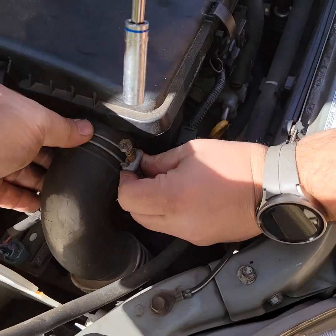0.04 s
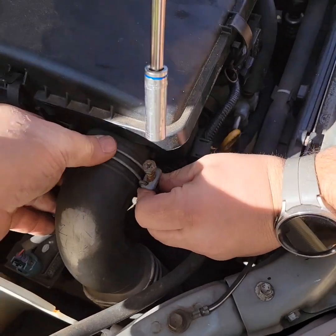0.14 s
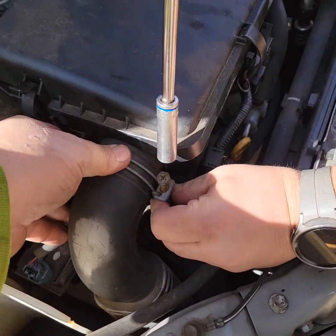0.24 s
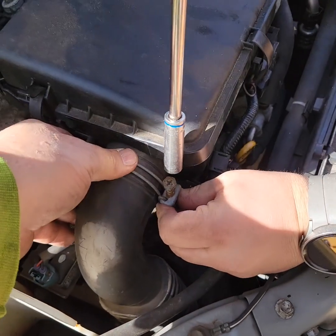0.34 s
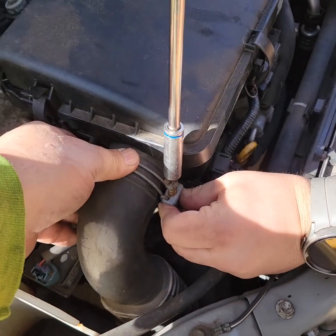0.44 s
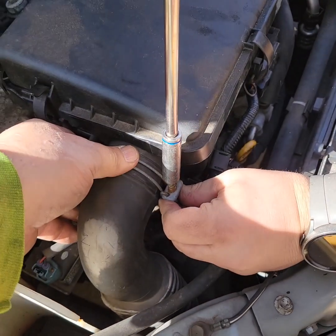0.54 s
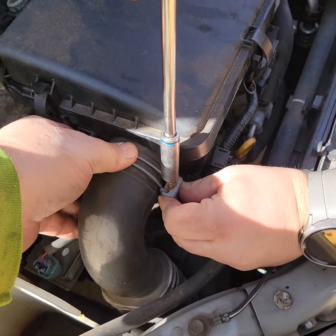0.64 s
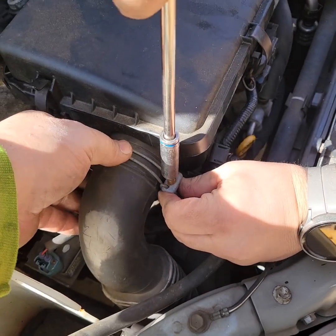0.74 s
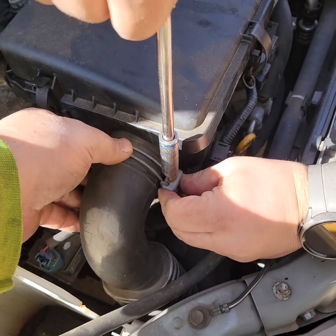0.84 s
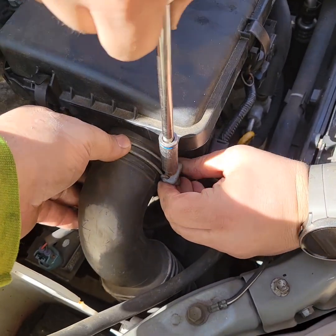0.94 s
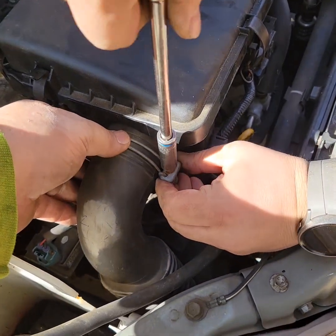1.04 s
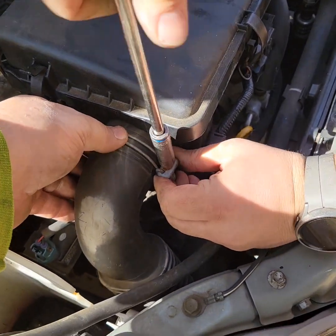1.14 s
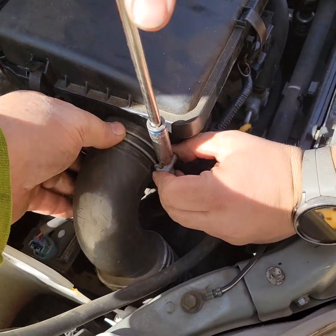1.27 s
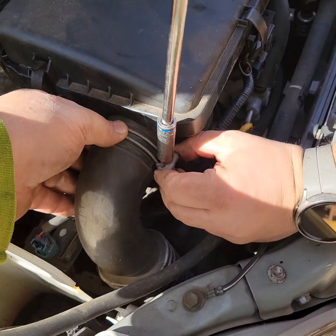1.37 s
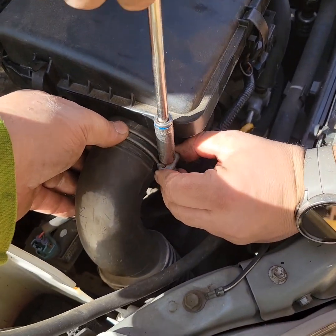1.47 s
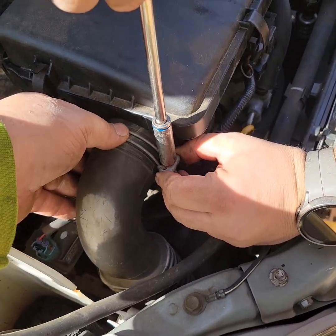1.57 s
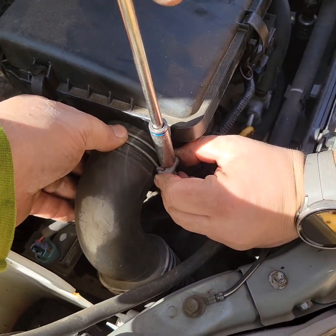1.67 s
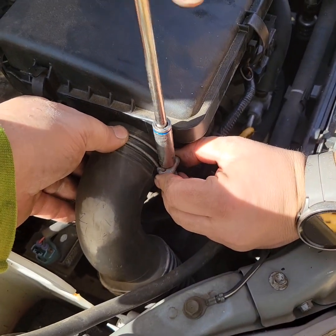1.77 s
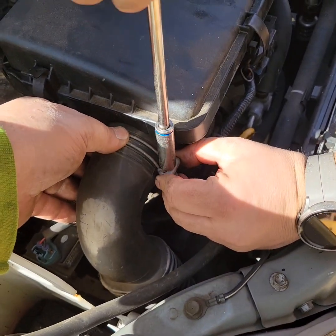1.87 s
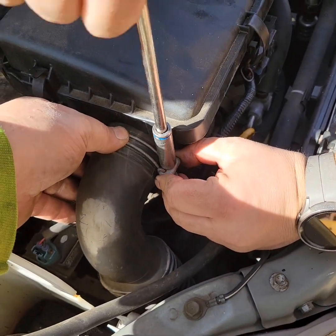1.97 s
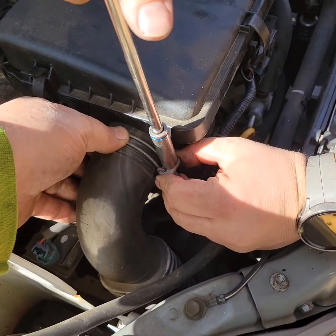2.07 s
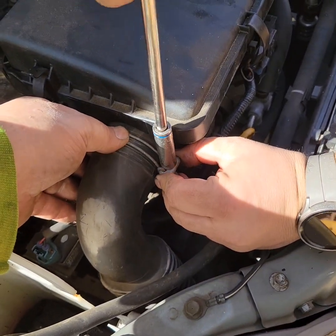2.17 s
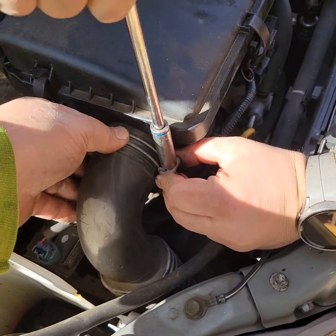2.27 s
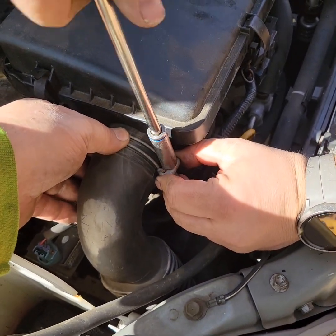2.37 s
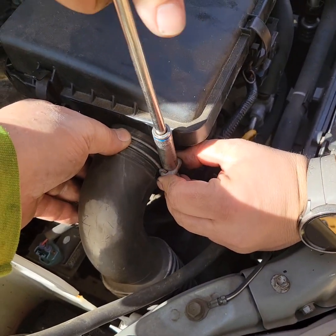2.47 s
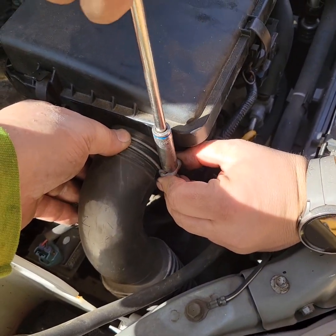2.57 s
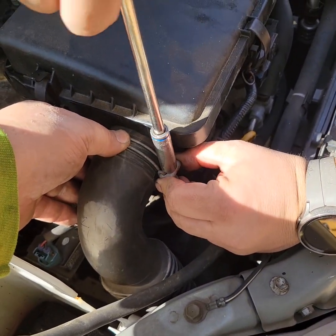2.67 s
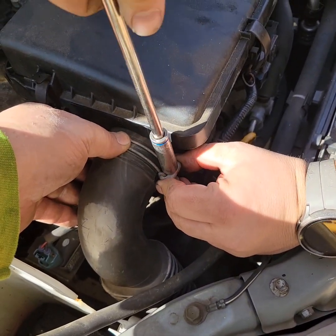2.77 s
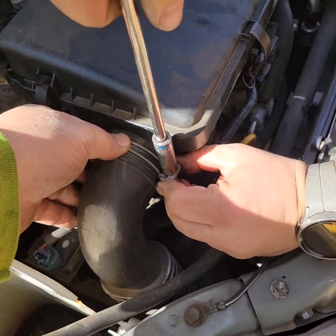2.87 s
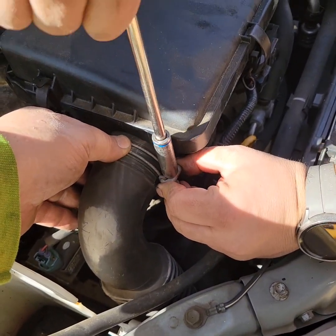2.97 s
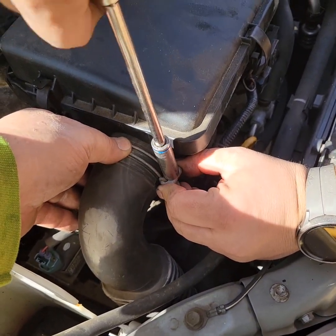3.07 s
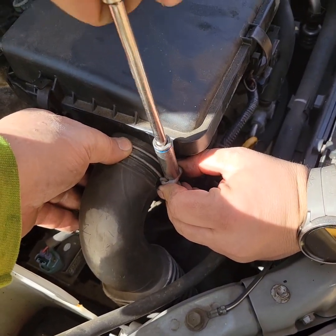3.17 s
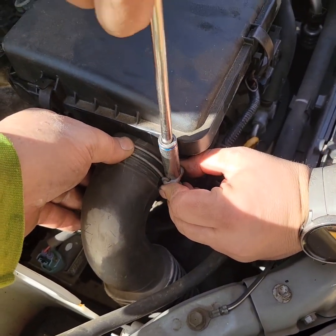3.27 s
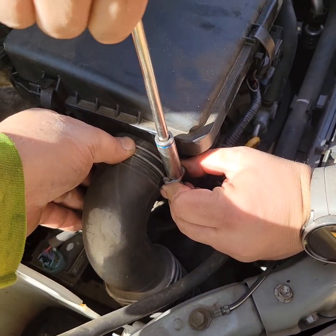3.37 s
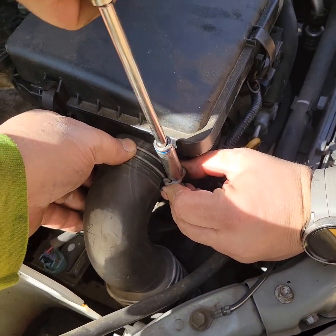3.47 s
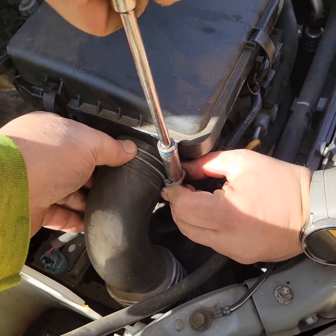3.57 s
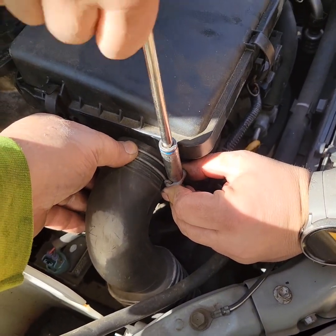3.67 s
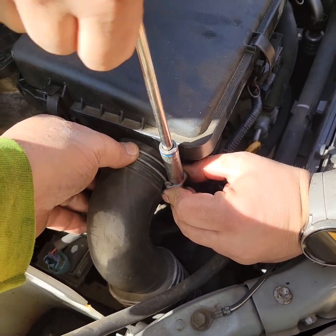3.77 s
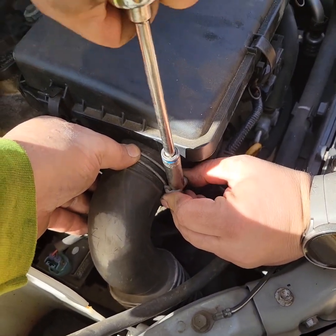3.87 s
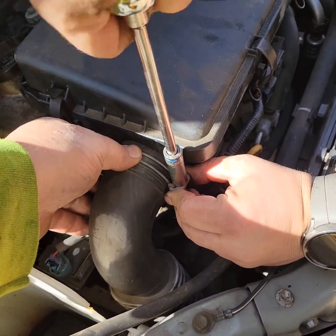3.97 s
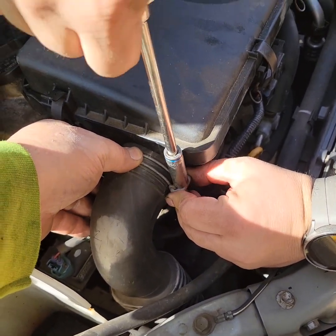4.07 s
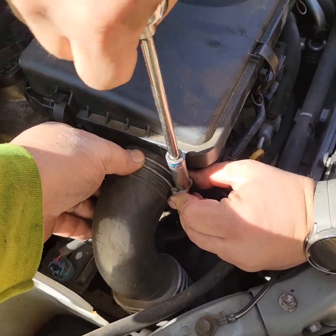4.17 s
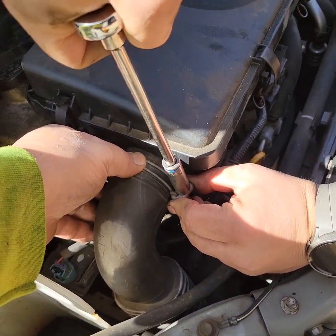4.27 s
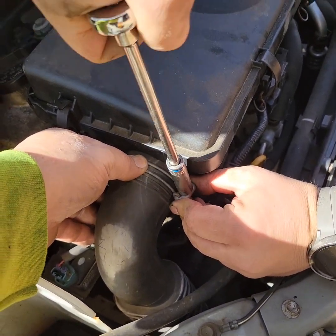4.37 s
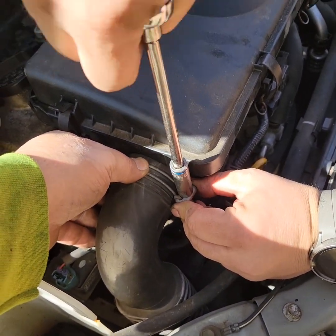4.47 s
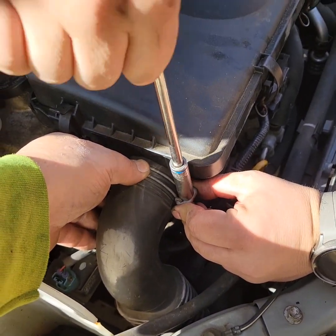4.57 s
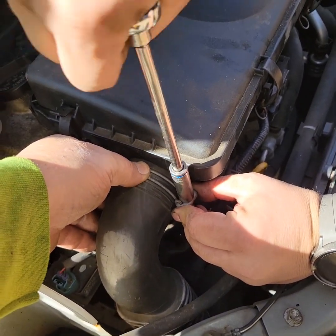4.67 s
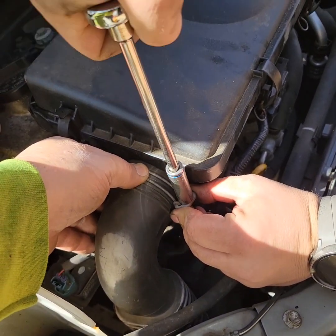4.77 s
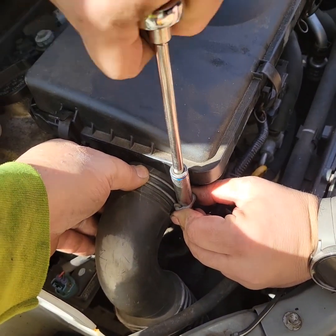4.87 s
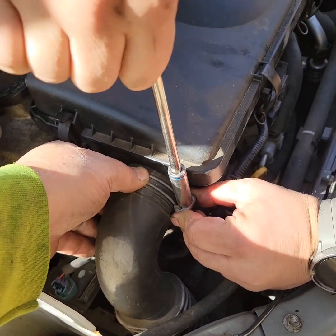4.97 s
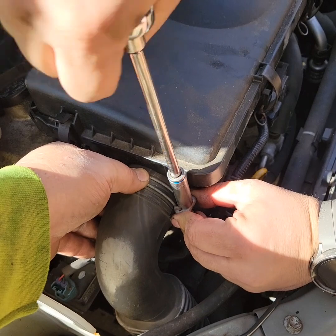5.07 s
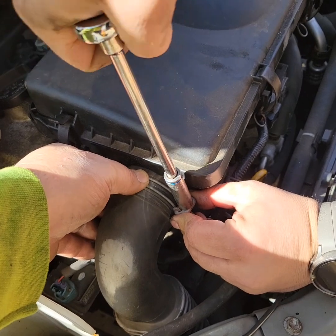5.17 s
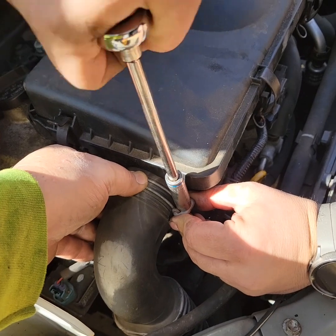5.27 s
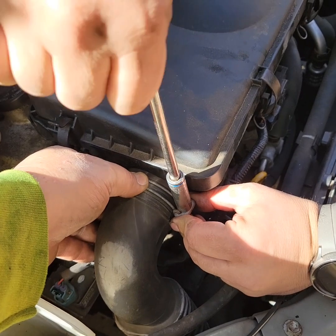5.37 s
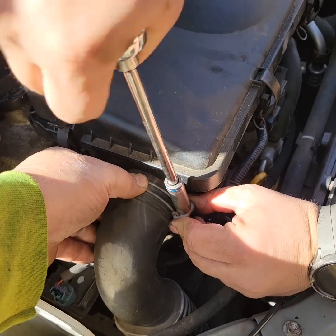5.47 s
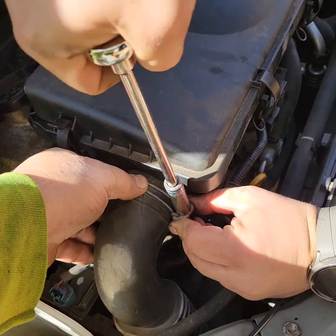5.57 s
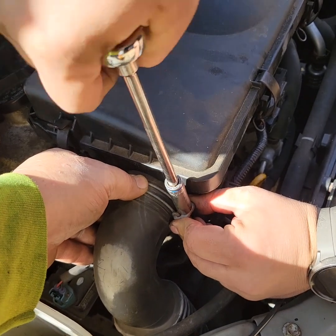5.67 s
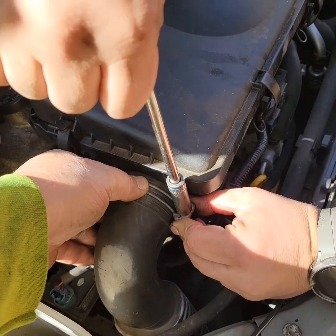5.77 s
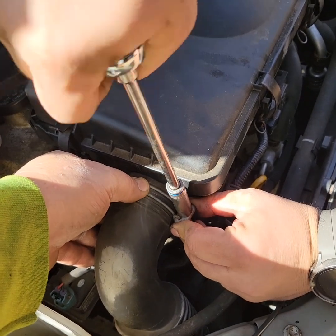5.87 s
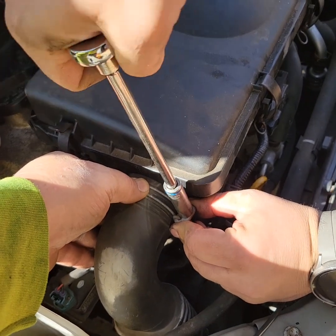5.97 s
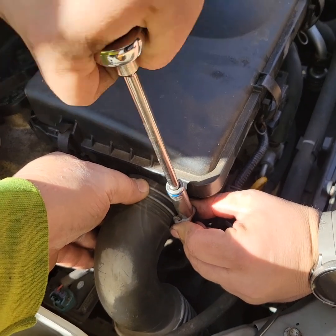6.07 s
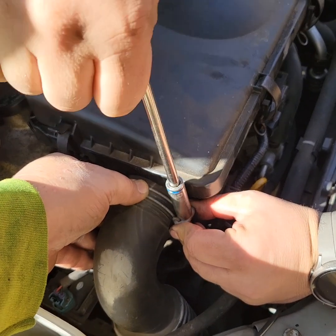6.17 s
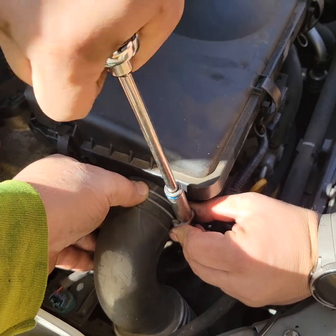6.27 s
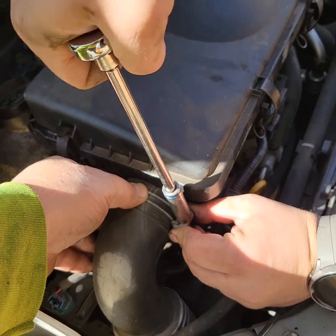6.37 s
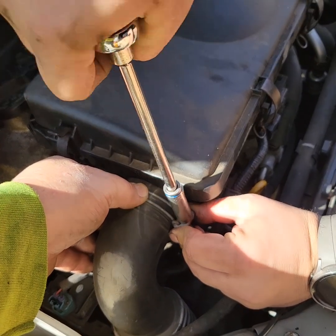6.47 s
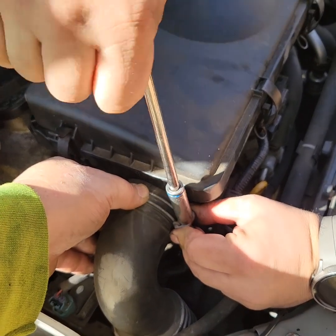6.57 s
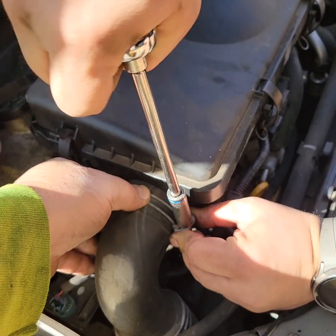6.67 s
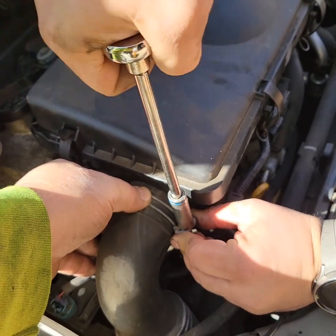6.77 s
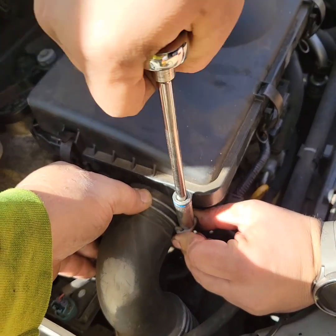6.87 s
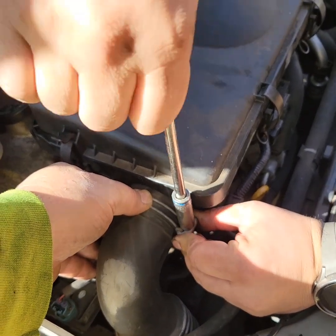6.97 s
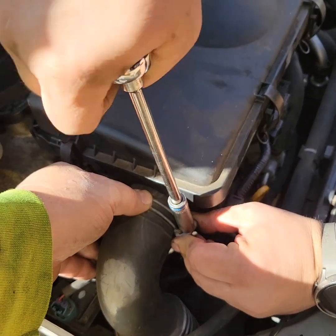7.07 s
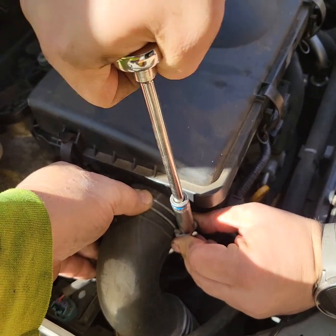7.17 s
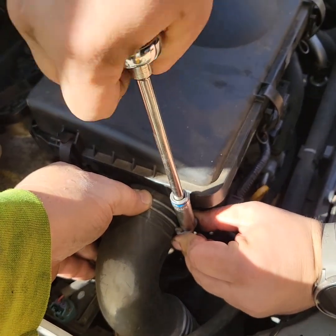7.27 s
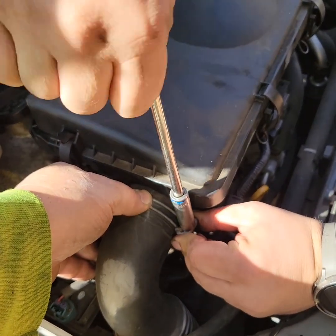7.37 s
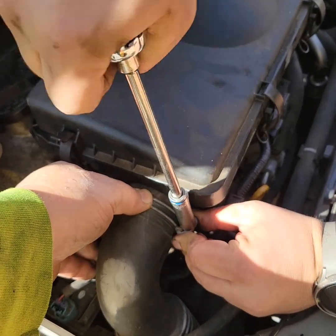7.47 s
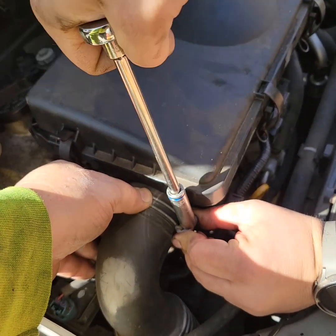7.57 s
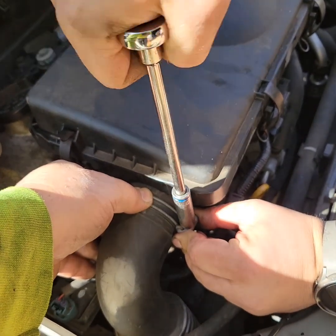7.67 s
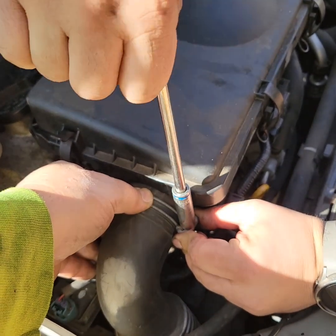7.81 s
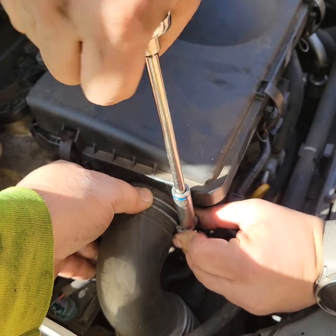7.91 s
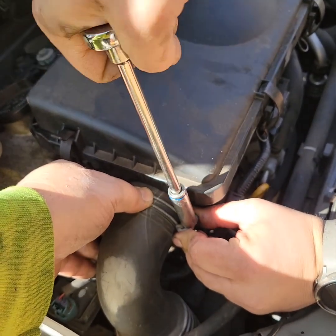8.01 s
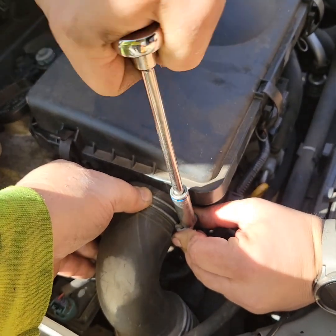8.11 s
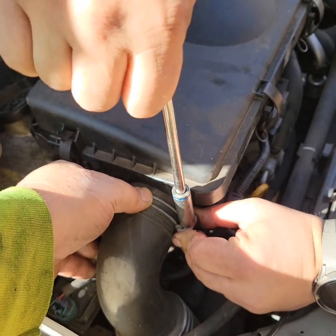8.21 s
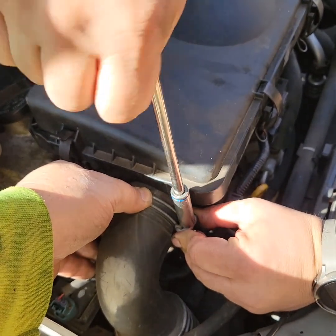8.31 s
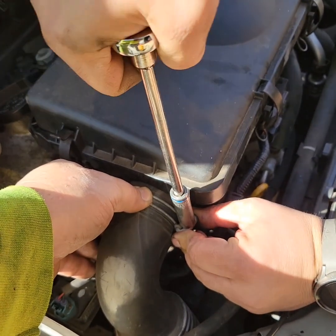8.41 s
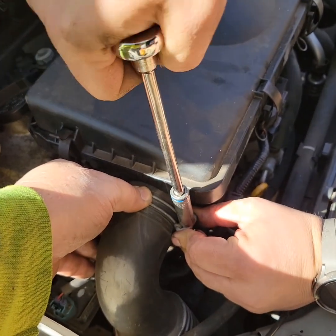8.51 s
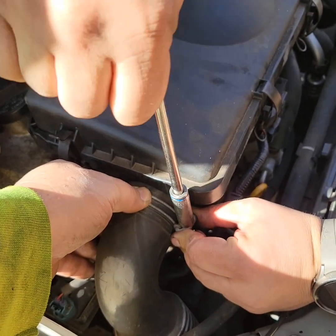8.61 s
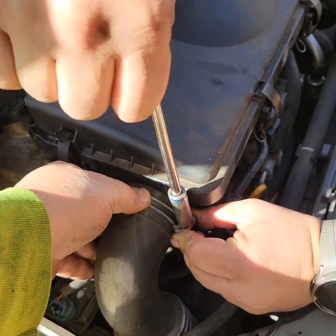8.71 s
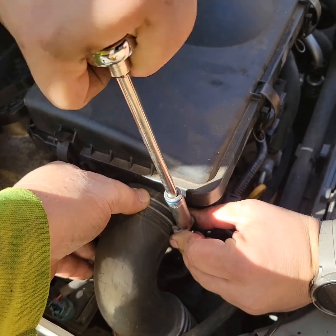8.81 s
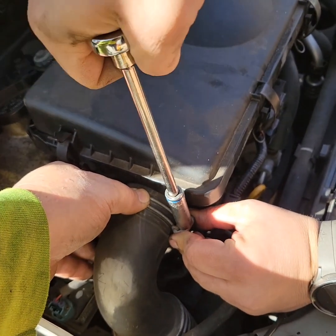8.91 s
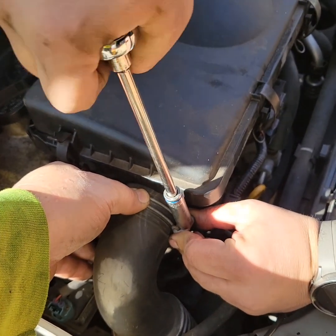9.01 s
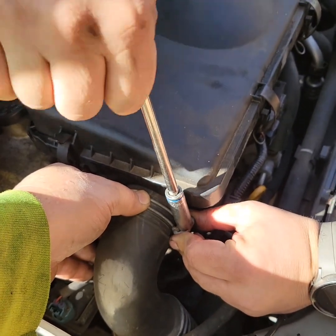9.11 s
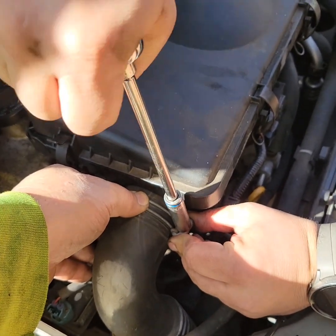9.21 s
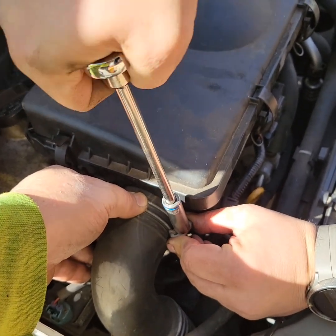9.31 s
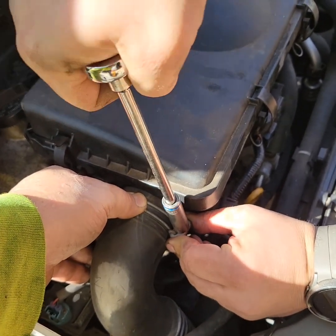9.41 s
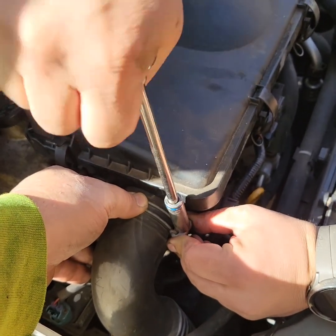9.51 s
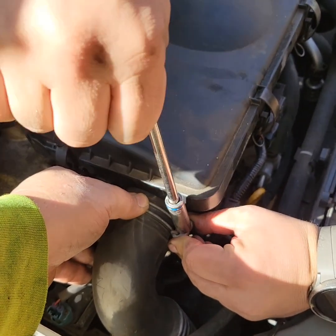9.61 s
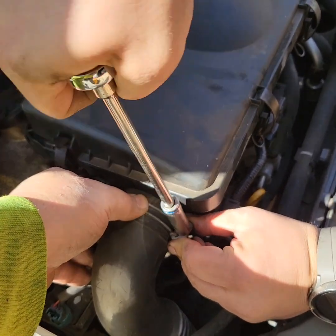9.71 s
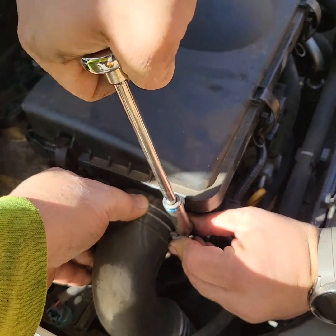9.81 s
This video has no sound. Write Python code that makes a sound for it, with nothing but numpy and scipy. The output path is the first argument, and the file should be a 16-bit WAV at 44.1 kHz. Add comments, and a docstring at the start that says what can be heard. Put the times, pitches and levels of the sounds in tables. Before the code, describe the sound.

Rhythmic ratchet clicking and soft hollow knocks in a car engine bay, as a hose clamp screw tightens and starts to squeak.

```python
"""A socket ratchet on a long extension bar tightens a hose clamp in an engine bay, in a quiet workshop.
First, over a low rumble, hands brush the hose and the socket ticks as it finds the screw.
Then the handle goes to and fro: on each back swing the pawl (a small catch) rattles over the teeth;
on each forward stroke the tool takes up the load with a knock and the screw rubs round.
As the clamp grows tight the screw sticks and slips: first thin whistles, at last loud squeaks."""
import sys
import numpy as np
from scipy import signal
from scipy.fft import rfft, irfft, next_fast_len
from scipy.io import wavfile

SR = 44100
rng = np.random.default_rng(int(sys.argv[2]) if len(sys.argv) > 2 else 0)


def wrap_up_sound(samples):
    """Save the sound to the file named by the first command line argument, as 16-bit audio."""
    columns = np.atleast_2d(samples).T
    # keep every value between -1 and 1, then stretch to whole-number steps
    tamed = np.clip(columns, -1, 1)
    steps = np.round(tamed * 32767).astype(np.int16)
    wavfile.write(sys.argv[1], SR, steps)


N = 434385
RING = 8192  # samples allowed for a blow to die away
TOP_HZ = 16000  # upper edge of the sound


def undb(db):
    """Turn decibels into a gain."""
    return 10 ** (np.asarray(db) / 20)


def unit(x):
    """Scale a sound to an average strength (rms) of 1."""
    return x / np.sqrt(np.mean(x ** 2))


def unit_energy(x):
    """Scale each channel to a total energy of 1."""
    return x / np.sqrt(np.sum(x ** 2, axis=-1, keepdims=True))


def gain_at(hz, spectrum):
    """Read the gain from a table of (frequency [Hz], level [dB])."""
    table_hz, db = np.transpose(spectrum)
    return undb(np.interp(np.log(hz + 1), np.log(table_hz), db))


def colour(x, spectrum):
    """Make a sound's lows and highs louder or softer, as the table says."""
    size = next_fast_len(x.shape[-1] + RING, True) // 2 * 2
    cepstrum = irfft(np.log(gain_at(np.fft.rfftfreq(size, 1 / SR), spectrum)))
    # this fold keeps the filter from ringing before the sound arrives
    cepstrum[1:size // 2] *= 2
    cepstrum[size // 2 + 1:] = 0
    return irfft(rfft(x, size) * np.exp(rfft(cepstrum)))[..., :x.shape[-1]]


def band(x, lo_hz, hi_hz):
    """Keep mostly what lies between two frequencies."""
    return signal.sosfilt(signal.butter(2, [lo_hz, hi_hz], "band", fs=SR, output="sos"), x)


def noise(size, alike, lag_s=0):
    """Left and right noise that share the part `alike`; the right comes lag_s late."""
    shared, own = rng.standard_normal(size), rng.standard_normal((2, size))
    left, right = np.sqrt(alike) * shared + np.sqrt(1 - alike) * own
    at = np.arange(size)
    return np.array([left, np.interp(at - round(lag_s * SR), at, right)])


def waver(size, rate_hz):
    """A smooth random wobble, roughly 1 up and down."""
    steps = np.arange(size) * rate_hz / SR
    return np.interp(steps, np.arange(RING), rng.standard_normal(RING))


def pan(x, left_db):
    """Make the left side louder than the right; a negative number leans right."""
    return x * undb(np.array([[left_db], [-left_db]]) / 2)


def fade(ring_s, size=RING):
    """Die away by 60 dB in ring_s, the ring time."""
    return np.exp(-np.log(1000) * np.arange(size) / SR / ring_s)


def ring(tones, skew):
    """The fading tones of a struck object; each reaches the right side skew radians late."""
    t = np.arange(RING) / SR
    out = 0
    for hz, db, ring_s in tones:
        phase = np.maximum(2 * np.pi * hz * t - np.array([[0], [skew]]), 0)
        out = out + undb(db) * fade(ring_s) * np.sin(phase)
    return unit_energy(out)


def tap(times, db, response):
    """Clean, hard blows, each setting off the response (an object's own sound)."""
    force = np.zeros(N)
    np.add.at(force, np.clip(times * SR, 0, N - 1).astype(int), undb(db))
    return signal.fftconvolve(force[None], response, axes=-1)[:, :N]


def strike(times, db, response, contact_s, rise_s=0.0003):
    """Gritty blows: each is a short burst of noise that sets off the response."""
    force = np.zeros(N + RING)
    push = fade(contact_s) * (1 - fade(rise_s))
    for t, gain in zip(times, undb(db)):
        at = int(np.clip(t * SR, 0, N - 1))
        force[at:at + RING] += gain * unit_energy(push * rng.standard_normal(RING))
    return signal.fftconvolve(force[None, :N], response, axes=-1)[:, :N]


# the lows and highs of the quiet workshop: (frequency [Hz], level [dB])
ROOM_COLOUR = [(15, -21), (25, -51), (53, 0.5), (87, 1), (127, -7), (190, -17), (796, -74), (988, -50),
               (1520, -72), (2160, -38), (2610, -28), (3720, -32.5), (4030, -36), (14000, -44.5),
               (16000, -53)]
def background(level_db=-53):
    """A low rumble, alike in both ears, under a wide, faint hiss."""
    narrow = colour(noise(N, alike=0.95), ROOM_COLOUR)
    wide = colour(noise(N, alike=0.095), ROOM_COLOUR)
    lows = signal.butter(2, 220, "low", fs=SR, output="sos")
    rumble = signal.sosfiltfilt(lows, narrow)
    hiss = wide - signal.sosfiltfilt(lows, wide)
    return unit(rumble + undb(-1.5) * hiss) * undb(level_db + waver(N, 2.8))


def echoes(x):
    """Sound bounces quickly round the engine bay, then fades faintly in the room."""
    size = SR // 2
    onset = np.clip(np.arange(size) / SR / 0.00054 - .5, 0, 1)
    bay = unit_energy(noise(size, alike=0.3) * fade(0.074, size) * onset)
    room = unit_energy(band(noise(size, alike=0.089), 220, 6000) * fade(0.23, size) * onset)
    return x + signal.fftconvolve(x, undb(-7.5) * bay + undb(-31.5) * room, axes=-1)[:, :N]


# hands shifting on the rubber hose: (time [s], level [dB])
HAND_LEVELS = [(0, -59.5), (.6, -59), (1.2, -64), (2.5, -57), (4.3, -66.5), (6, -62), (8, -57),
               (9.85, -57.5)]
# sleeve and fingers brushing the hose: (start [s], length [s], level [dB])
BRUSHES = [(0.044, 0.23, -55.5), (0.927, 0.12, -58)]
def hands():
    """Hands press and slide on the hose: an uneven, dull rustle and two soft brushes."""
    t = np.arange(N) / SR
    pressure = undb(3 * waver(N, 18) + np.interp(t, *np.transpose(HAND_LEVELS)))
    rustle = unit(band(noise(N, alike=1, lag_s=0.0004), 77, 770)) * pressure
    swell = 0
    for start, length, db in BRUSHES:
        swell = swell + undb(db) * np.sin(np.pi * np.clip((t - start) / length, 0, 1))
    brush = unit(band(noise(N, alike=0.22), 630, 4600)) * swell * undb(2.9 * waver(N, 102.2))
    return pan(rustle, 2) + brush


# the lows and highs of the rubbing screw: (frequency [Hz], level [dB])
RUB_COLOUR = [(120, -37), (200, 1), (829, 0), (1290, -8.5), (1460, -3.5), (1990, -8), (6590, -14),
              (8520, -32.5), (12000, -47), (15600, -48), (22000, -120)]
# the rubbing grows as the clamp tightens: (time [s], level [dB])
RUB_LEVELS = [(1.6, -57.5), (3, -54), (4.7, -52), (6.5, -52.5), (8, -52), (9.7, -48.5)]
def screw_rub(delay_s=0.019, rise_s=0.12, ease_s=0.045, rest_s=0.1):
    """Between back swings the screw turns and its thread grinds along the clamp's band."""
    t, turning = np.arange(N) / SR, np.zeros(N)
    for swing, next_swing in zip(SWINGS[:-1], SWINGS[1:]):
        begin, stop = swing[1] + delay_s, next_swing[0] - rest_s
        turning += np.interp(t, [begin, begin + rise_s, stop - ease_s, stop], [0, 1, 0.21, 0])
    strength = (turning + 0.26) * undb(np.interp(t, *np.transpose(RUB_LEVELS)))  # never quite silent
    grit = undb(3.6 * waver(N, 400) + waver(N, 68))
    grind = unit(colour(noise(N, alike=0.25, lag_s=0.00031), RUB_COLOUR))
    return pan(grind, -3.5) * grit * strength


# the loose drive rattles before a swing: (time ahead [s], tick level [dB], knock level [dB])
SLACK = [(.026, -53.5, -53.5), (.010, -42, -47.5)]
def slack():
    """The drive crosses its slack as the handle turns back: gives times, tick and knock levels."""
    rows = [(start - ahead, tick_db, knock_db)
            for ahead, tick_db, knock_db in SLACK for start, *_ in SWINGS]
    return np.transpose(rows)


# the tool takes up the load, and at 0.38 s the socket knocks the hose: (time [s], level [dB], hardness [dB],
# socket tick level [dB])
KNOCKS = [(0.380, -36, 4.5, -47.5), (0.612, -46, -7, -54), (1.649, -45, 1, -42.5), (2.012, -43.5, -10, -42),
          (2.363, -39.5, -4, -39.5), (2.719, -40, 2, -42.5), (3.087, -42, -4.5, -37.5),
          (3.442, -46, -3, -48.5), (3.815, -39, -4, -42.5), (3.880, -42, 2, -40), (4.230, -42, -19, -44.5),
          (4.681, -38, -9, -42), (5.092, -38.5, -9, -37), (5.488, -36, -4, -54), (5.885, -36.5, -15, -46),
          (6.294, -38, -6, -42.5), (6.697, -40, -6, -41.5), (6.870, -45, 2.5, -51), (7.079, -42, 0, -36.5),
          (7.284, -49, -3, -50), (7.481, -40, -19, -44), (7.933, -42.5, -5, -47), (7.946, -33, -11, -43.5),
          (8.350, -35.5, -5, -37), (8.771, -34.5, -10, -41), (9.226, -35, -10.5, -48),
          (9.498, -37, -2, -51), (9.677, -31.5, -14, -32.5)]
# the tones of the hose and the hollow air box it joins: (pitch [Hz], level [dB], ring time [s])
AIR_BOX_TONES = [(181, -18, 0.27), (346.6, -5.5, 0.1), (367, -12.5, 0.13), (523, -11.5, 0.17),
                 (650, -14, 0.15), (785, 8.5, 0.027), (850, -11, 0.16), (1034, -17.5, 0.083),
                 (1230, -7, 0.046)]
def knocks(slack_hard_db=-11):
    """The tool jolts the clamp, and once the socket knocks the hose; the rubber hose gives, so the air box
    answers with a hollow tock."""
    slack_t, _, slack_db = slack()
    loose = np.c_[slack_t, slack_db, np.full(len(slack_t), slack_hard_db)]
    t, db, hard_db = np.vstack([np.array(KNOCKS)[:, :3], loose]).T
    hollow = strike(t, db + 31, ring(AIR_BOX_TONES, skew=1.32), contact_s=0.054, rise_s=0.016)
    clamp = unit_energy(band(noise(RING, alike=0.76, lag_s=0.00019) * fade(0.051), 980, 1950))
    hose = unit_energy(band(noise(RING, alike=0.64, lag_s=0.0004) * fade(0.048), 354, 540))
    # the heavy hose answers a moment later and lower
    thud = strike(t + 0.0081, db + 18.5, hose, contact_s=0.054, rise_s=0.028)
    clack = strike(t, db + hard_db + 29, clamp, contact_s=0.012, rise_s=0.0038)
    return pan(hollow + thud, -2.5) + pan(clack, -0.87)


# the socket finds the screw and shifts on it: (time [s], level [dB], brightness [dB])
LONE_TICKS = [(0.563, -44.5, -26), (0.587, -48, -28), (0.815, -35, 5.5), (0.853, -33.5, 2),
              (3.799, -37.5, -19), (4.014, -43.5, -22), (4.877, -49, -15), (5.506, -36, -30),
              (6.361, -41.5, -3), (8.335, -38, -15), (9.207, -46, -26)]
# the tones of the steel tool: (pitch [Hz], level [dB], ring time [s])
STEEL_TONES = [(3600, -16, .04), (3920, -23, .04), (5580, 7.5, 0.019), (5400, -17, 0.031), (6100, -4, 0.06),
               (6680, -0.5, 0.054), (7500, 16, 0.0083), (14940, 6.5, 0.044), (15250, -12, 0.0067)]
def ticks(load_bright_db=-8.5, slack_bright_db=-7, rebound_s=0.016, rebound_db=-9.5):
    """Steel touches steel: on its own, with each knock, and in the loose drive."""
    load_t, _, _, load_db = np.transpose(KNOCKS)
    loaded = np.c_[load_t, load_db, np.full(len(load_t), load_bright_db)]
    rebounds = loaded + [rebound_s, rebound_db, 0]  # the socket settles with a lighter tick
    slack_t, slack_db, _ = slack()
    loose = np.c_[slack_t, slack_db, np.full(len(slack_t), slack_bright_db)]
    t, db, bright_db = np.vstack([LONE_TICKS, loaded, rebounds, loose]).T
    rattle = noise(RING, alike=0.65, lag_s=.0001) * (fade(0.03) + undb(-12.5) * fade(0.13))
    body = strike(t, db + 25, unit_energy(band(rattle, 2320, 4440)), contact_s=0.0012)
    edge = strike(t, db + bright_db + 20, unit_energy(band(rattle, 4300, 18000)), contact_s=0.0099)
    steel = strike(t, db + 22.5, band(ring(STEEL_TONES, skew=0.99), 2500, 6700), contact_s=0.0016)
    return pan(body + edge + steel, -2.6)


# how strongly the clamp gives off a squeak's lows and highs: (frequency [Hz], level [dB])
CLAMP_COLOUR = [(500, 2.5), (1250, 3), (2000, -4.5), (3000, 8), (4200, 4), (6000, 4), (8000, -6),
                (15000, -25)]
# which side a squeak leans to: (frequency [Hz], left minus right [dB])
CLAMP_SIDE = [(700, -3.5), (1250, -2.5), (3000, -3.5), (6000, -8.5), (10000, 4.5), (15000, -13)]
def slip(length, pitch_hz, glide, db, rough, arch=0.016):
    """One squeak: the screw sticks and slips so fast that it makes a tone, unsteady when rough."""
    size = int(length * SR)
    from_middle = np.linspace(-.5, .5, size)
    hz = pitch_hz * (1 + glide * from_middle - arch * (2 * from_middle) ** 2)
    hz *= 1 + 0.0065 * waver(size, 330) + 0.098 * rough * waver(size, 2260)
    # overtones are multiples of the pitch; a weak, smooth or low squeak has fainter ones
    weak_db = max(-46.5 - db, 0)
    smooth_db = 17 * max(1 - rough / 0.32, 0)
    db_per_octave = -4 - weak_db - smooth_db + 2.3 * np.log2(pitch_hz / 1500)
    multiple = np.arange(1, TOP_HZ // pitch_hz + 1)[:, None]
    lean = gain_at(multiple * pitch_hz, CLAMP_SIDE) ** np.array([[[.5]], [[-.5]]])
    weight = undb(db_per_octave * np.log2(multiple)) * gain_at(multiple * pitch_hz, CLAMP_COLOUR)
    late = np.array([[[0]], [[1.4]]])  # the right side lags [radians]
    tone = np.sum(weight * lean * np.sin(2 * np.pi * multiple * np.cumsum(hz) / SR - late), axis=1)
    tone /= np.std(tone.mean(axis=0))
    scrape = unit(band(noise(RING, alike=0.43), min(pitch_hz, 3000), 6150))[:, :size]
    flutter = unit(undb(3.3 * waver(size, 296) + 4.5 * rough * waver(size, 900)))
    return undb(db) * signal.windows.tukey(size, .35) * flutter * (tone + 0.37 * rough * scrape)


# thin whistles of the turning screw: (start [s], length [s], pitch [Hz], level [dB])
WHISTLES = [(3.484, .038, 9560, -46), (3.871, 0.03, 9630, -47), (4.26, 0.017, 9670, -53.5),
            (5.140, 0.044, 10180, -45), (5.899, 0.056, 9700, -45), (6.353, 0.035, 10200, -45.5),
            (6.722, 0.057, 10250, -43), (7.097, 0.023, 10150, -48.5), (7.517, 0.092, 9570, -42),
            (7.994, 0.048, 9960, -42.5), (8.371, 0.052, 9800, -36), (8.826, 0.043, 9460, -40)]
# squeaks of the tight screw:
# (start [s], length [s], pitch [Hz], glide [share of pitch], level [dB], roughness [0 = smooth])
SQUEAKS = [(3.884, 0.025, 1705, 0.012, -44.5, 0), (5.173, 0.015, 1584, 0.14, -50, 0.15),
           (5.535, 0.025, 785, -0.00047, -40, 0.17), (5.557, 0.023, 1157, -0.13, -31, 0.11),
           (5.587, 0.018, 948, -0.24, -27.5, .2), (6.345, 0.0123, 2382, 0.15, -45, 1.05),
           (6.750, 0.041, 1530, -0.035, -52.5, 0.8), (7.121, 0.044, 1470, -0.029, -47.5, 0),
           (7.563, 0.034, 2972, -0.066, -21.5, 0.33), (7.985, 0.047, 1190, -0.089, -44.5, 1.17),
           (8.411, .014, 1508, 0.054, -40, 0.35), (8.429, 0.0077, 1706, 0.1, -34, 0.22),
           (8.810, 0.008, 1389, 0.11, -28, 0.5), (8.815, 0.0069, 2940, 0.11, -20, .2),
           (8.839, .033, 1190, 0, -37, 0.21), (8.864, 0.015, 3067, -0.02, -17, .3),
           (8.874, 0.028, 1363, 0.15, -22, 0.64), (9.240, 0.0102, 753, -0.11, -27.5, 0.17),
           (9.258, 0.012, 1630, .04, -25, 0.3), (9.270, .027, 1386, -0.105, -19, 0.45),
           (9.291, 0.033, 1147, -0.21, -20, 0.88), (9.310, 0.05, 650, 0.11, -24, 0.48),
           (9.320, 0.049, 1287, 0.078, -24.5, 0.16), (9.715, 0.036, 3220, 0.0675, -12, .08),
           (9.743, 0.032, 3174, -0.041, -15, 0.31), (9.764, 0.027, 1550, -0.046, -22, 0.32)]
# the tones of the clamp's steel band: (pitch [Hz], level [dB], ring time [s])
BAND_TONES = [(2960, 0, .26), (2940, -3, 0.27)]
def squeaks(whistle_glide=-0.046, whistle_rough=0.11, band_db=-39):
    """Whistles, which sag as the hand slows, and full squeaks leave the clamp's band ringing."""
    out = np.zeros((2, N + RING))
    whistles = [(start, length, hz, whistle_glide, db, whistle_rough)
                for start, length, hz, db in WHISTLES]
    for start, *shape in whistles + list(SQUEAKS):
        sound, at = slip(*shape), int(start * SR)
        out[:, at:at + sound.shape[1]] += sound
    ringing = signal.fftconvolve(out, ring(BAND_TONES, skew=.5), axes=-1)
    return out[:, :N] + undb(band_db) * ringing[:, :N]


# the tones that run along the extension bar: (pitch [Hz], level [dB], ring time [s])
BAR_TONES = [(5427, 8, 0.051), (5382, 11.5, 0.056), (7030, 13.5, 0.02), (15300, 8, 0.054),
             (14200, -38, 0.02)]
def extension_bar(t, db, grips=4, detune=0.024):
    """Each tooth rings the bar; a few grips take turns, shifting its pitch from swing to swing."""
    grip = np.searchsorted(np.array(SWINGS)[:, 0], t, side="right") % grips
    out = 0
    for k in range(grips):
        tones = [(hz * (1 + detune * rng.standard_normal()), tone_db, ring_s)
                 for hz, tone_db, ring_s in BAR_TONES]
        out = out + tap(t[grip == k], db[grip == k], ring(tones, skew=1))
    return out


# back swings of the handle:
# (start [s], end [s], top speed [teeth per s], level [dB], level change over the swing [dB])
SWINGS = [(1.378, 1.565, 185, -23.5, -4.5), (1.837, 1.956, 245, -20.5, -4), (2.205, 2.315, 242, -20.5, 7.5),
          (2.557, 2.666, 224, -20.5, 3.5), (2.921, 3.046, 229, -21, 8.5), (3.268, 3.408, 217, -20.5, -1.5),
          (3.653, 3.77, 250, -19, 3.5), (4.073, 4.120, 150, -23.5, -1), (4.469, 4.636, 185, -22, 3),
          (4.915, 5.04, 228, -21.5, -4.5), (5.328, 5.455, 220, -19.5, -1), (5.718, 5.81, 235, -23, 0.5),
          (6.124, 6.232, 219, -19.5, 4), (6.498, 6.66, 195, -21.5, 1), (6.923, 7.016, 248, -19.5, 1),
          (7.336, 7.411, 202, -21.5, 2), (7.736, 7.873, 210, -20, 1), (8.155, 8.3, 224, -21, 0.5),
          (8.596, 8.709, 245, -20.5, -4.5), (9.043, 9.147, 235, -21.5, -0.5), (9.505, 9.628, 186, -20, -4)]
def teeth(speed_db=8):
    """The pawl drops once for each tooth: gives times, levels and how much of the swing is done."""
    rows, part = [], np.linspace(0, 1, 60)
    speed = np.interp(part, [0, .34, 1], [.68, 1, .36])  # the wrist speeds up, then brakes
    travel = np.r_[0, np.cumsum(speed[1:] + speed[:-1]) / 2] * part[1]
    for start, end, top_speed, db, change_db in SWINGS:
        passed = travel * top_speed * (end - start)  # teeth passed so far
        done = np.interp(np.linspace(0, passed[-1], round(passed[-1]) + 1), passed, part)
        level = db + change_db * (done - .5)
        level += speed_db * np.log10(np.interp(done, part, speed))  # faster is louder
        rows.append(np.c_[start + done * (end - start), level, done])
    return np.vstack(rows).T


# the lows and highs of the pawl's click: (frequency [Hz], level [dB])
PAWL_COLOUR = [(130, -30.5), (220, -41), (345, -5.5), (405, -25), (485, -6.5), (623, -13.5), (786, -3),
               (993, -17), (2030, -10), (3070, -2), (4560, -3), (5450, 1), (9180, -9), (14900, -3.5),
               (16000, -52)]
# the tool's head makes the click hollow in the middle, bright on top: (frequency [Hz], level [dB])
HEAD_COLOUR = [(300, 1.5), (800, 1.5), (1400, 1.5), (2400, -3.5), (3600, 1.5), (5600, 0.5), (10200, 1.5),
               (13000, -9), (15200, 6)]
def ratchet(spots=8, tightening_db_per_s=2.75):
    """The pawl snaps onto each tooth: the head rattles, the steel rings and the air box murmurs."""
    t, db, done = teeth()
    # a slow tooth lets the pawl drop further, so its click is stronger
    gap_s = np.clip(np.diff(t, append=t[-1] + 1), .004, .009)
    db = db + 1.5 * np.log10(gap_s / 0.0077) + 2.7 * rng.standard_normal(len(t))
    # the pawl lands on one of a few spots, each with its own rattle
    spot, snap = rng.integers(0, spots, len(t)), 0
    for k in range(spots):
        rattle = noise(RING, alike=0.37, lag_s=.00012) * (fade(0.024) + undb(-21.5) * fade(0.086))
        click = colour(unit_energy(colour(rattle, PAWL_COLOUR)), HEAD_COLOUR)
        snap = snap + strike(t[spot == k], db[spot == k] + 16.5, click, contact_s=0.0059, rise_s=0.003)
    # it also scrapes up the side of the next tooth
    tooth_side = unit_energy(band(noise(RING, alike=0.067) * fade(0.009), 11640, 13150))
    scrape = strike(t, db + 7.5, tooth_side, contact_s=0.016)
    bar = extension_bar(t, db + 18 - 27 * done)  # loudest early in a swing, while the grip is loose
    steel = tap(t, db + 0.5, ring(STEEL_TONES, skew=0.63))
    # the tighter the clamp, the more of each click it passes on to the air box
    box_db = 0.56 * db - 12.5 + tightening_db_per_s * (t - t.mean())
    box = strike(t, box_db, ring(AIR_BOX_TONES, skew=1.3), contact_s=0.0091, rise_s=0.0085)
    return pan(snap, -2.5) + pan(scrape, 5) + pan(bar, -4) + pan(steel, -6) + pan(box, -4)


def scene():
    """The tool at work, with its echoes, over the workshop's background."""
    work = ratchet() + ticks() + knocks() + screw_rub() + hands() + squeaks()
    return echoes(work) + background()


def record(dry):
    """A phone close by rounds off the loudest peaks and cuts the highest treble."""
    rounded = dry / (1 + (dry / .8) ** 4) ** .25
    return signal.sosfilt(signal.ellip(8, .2, 70, TOP_HZ, fs=SR, output="sos"), rounded)


dry = scene()
out = record(dry)
wrap_up_sound(out)
```